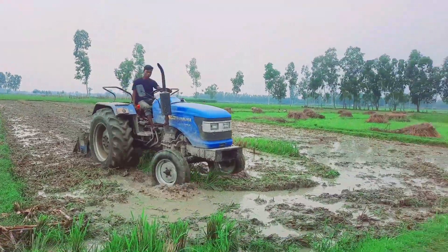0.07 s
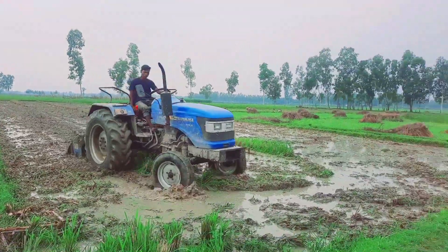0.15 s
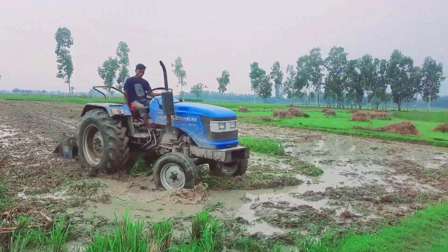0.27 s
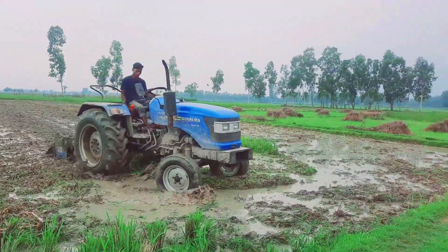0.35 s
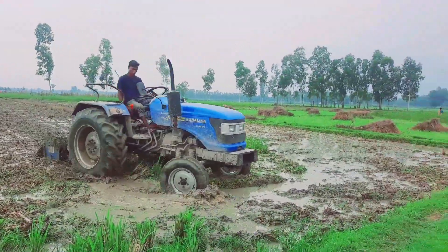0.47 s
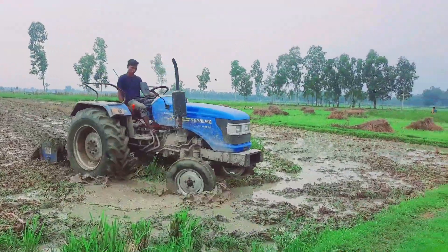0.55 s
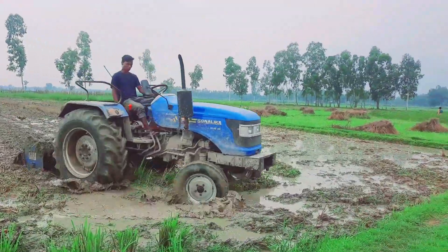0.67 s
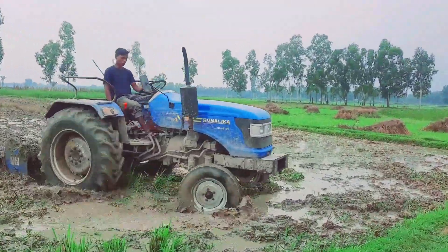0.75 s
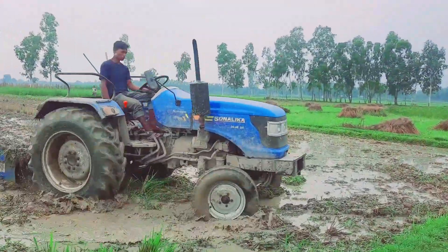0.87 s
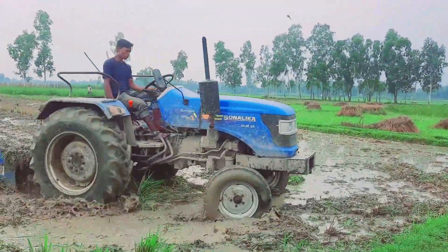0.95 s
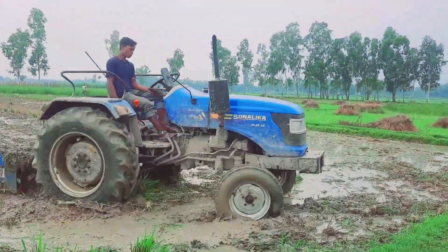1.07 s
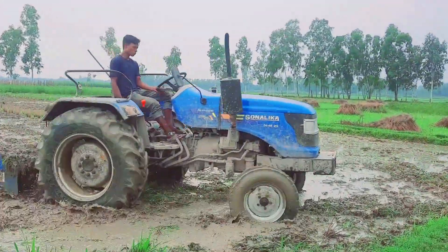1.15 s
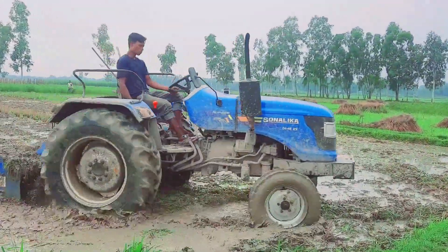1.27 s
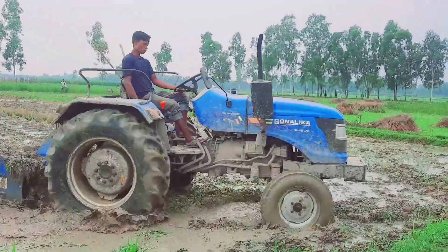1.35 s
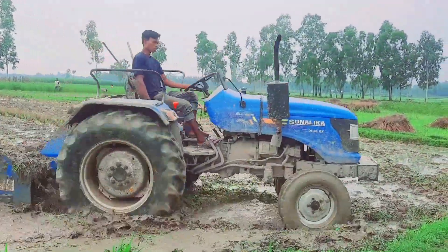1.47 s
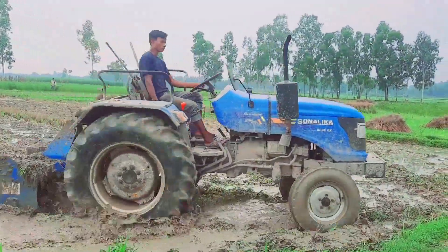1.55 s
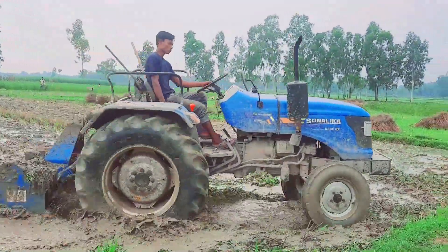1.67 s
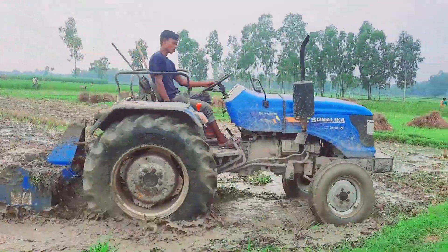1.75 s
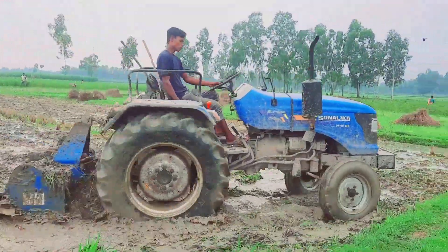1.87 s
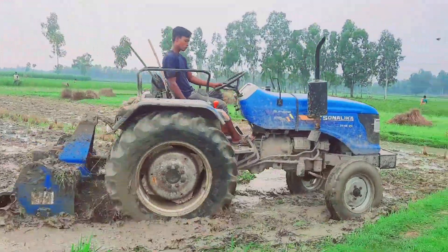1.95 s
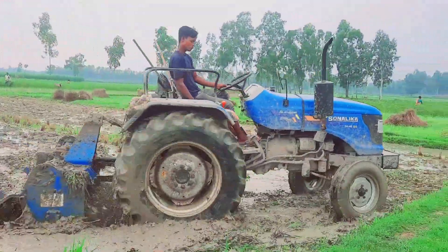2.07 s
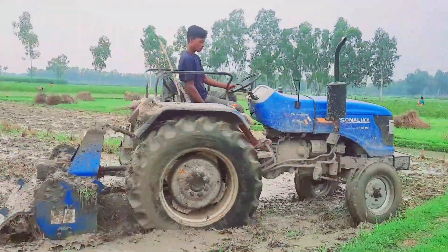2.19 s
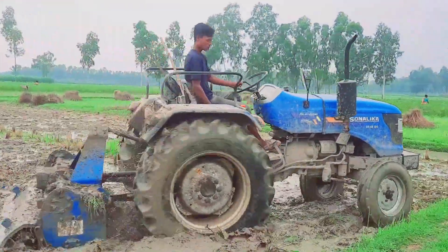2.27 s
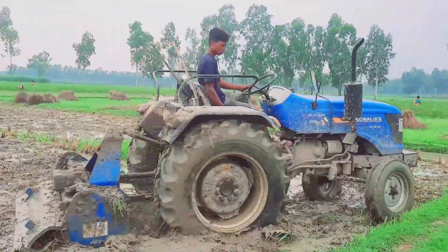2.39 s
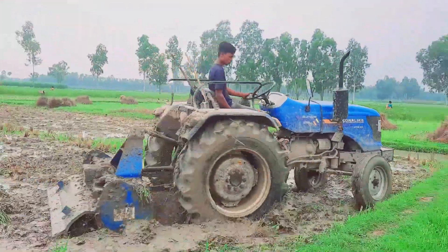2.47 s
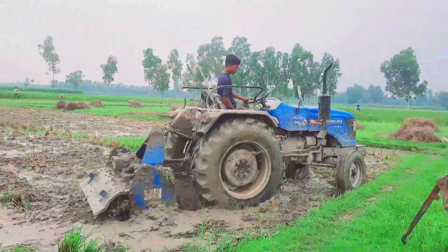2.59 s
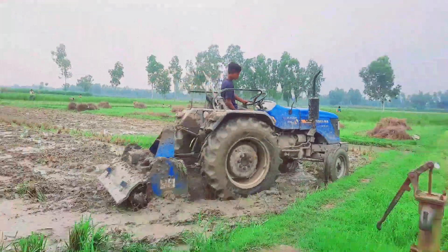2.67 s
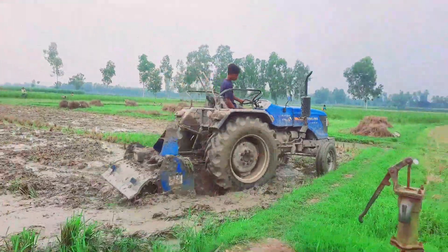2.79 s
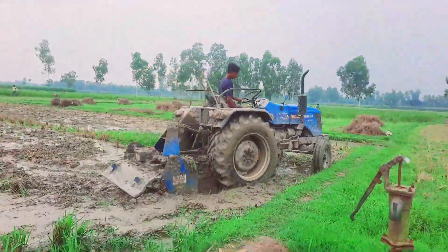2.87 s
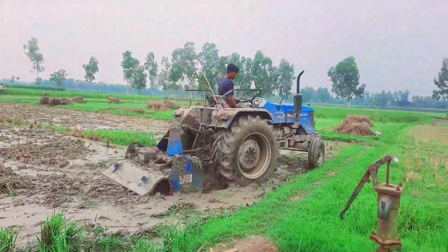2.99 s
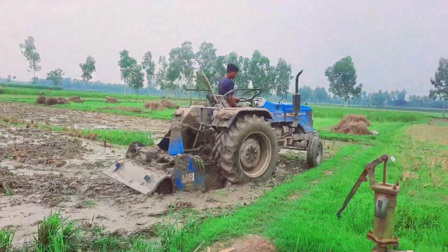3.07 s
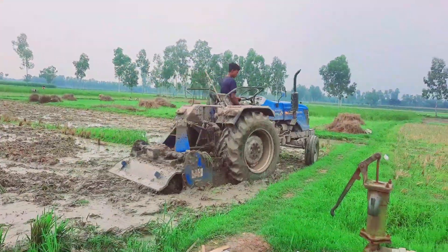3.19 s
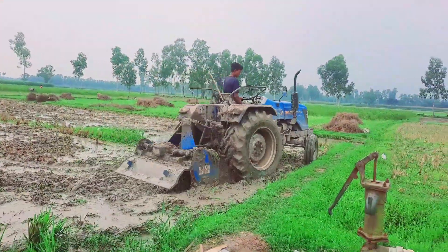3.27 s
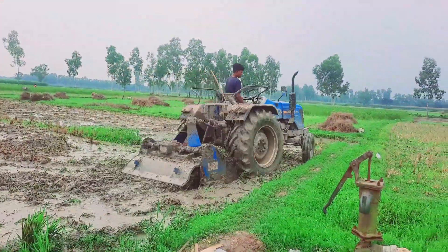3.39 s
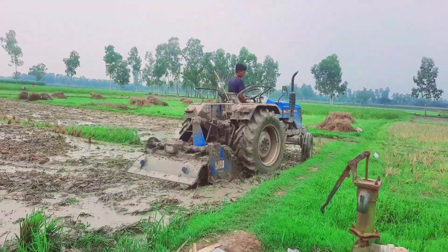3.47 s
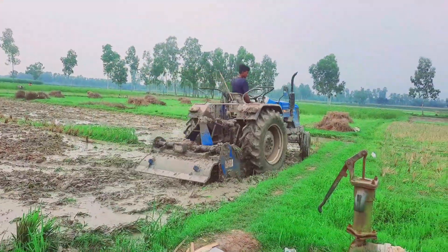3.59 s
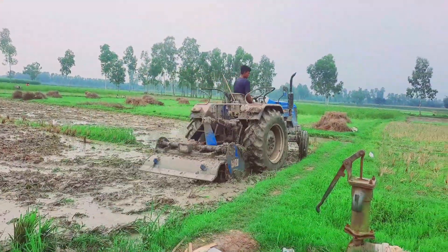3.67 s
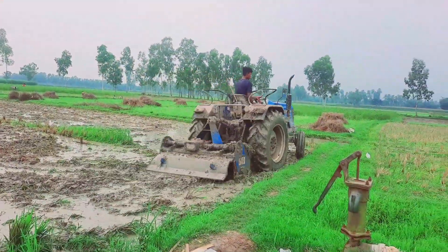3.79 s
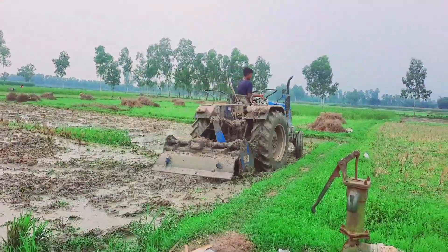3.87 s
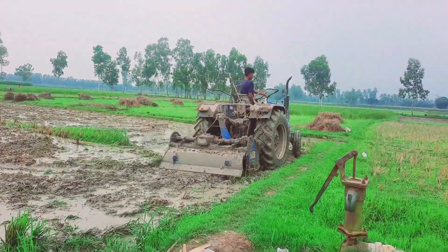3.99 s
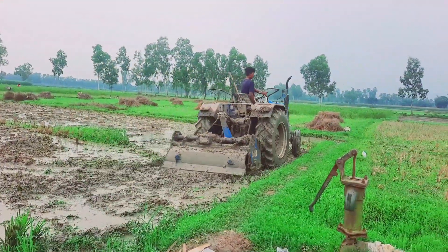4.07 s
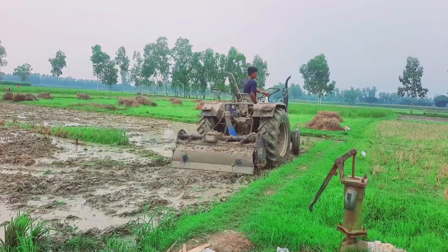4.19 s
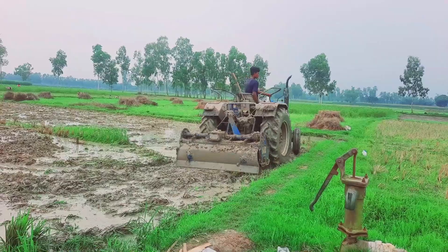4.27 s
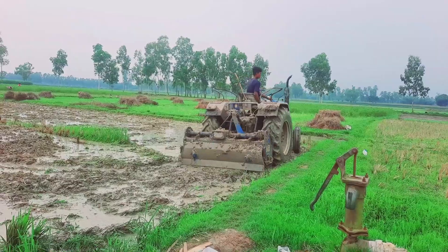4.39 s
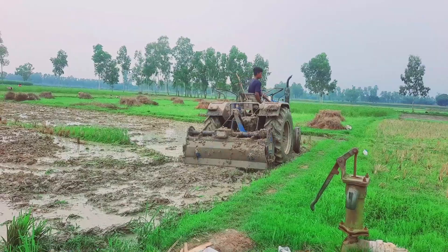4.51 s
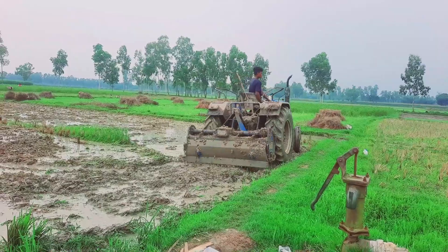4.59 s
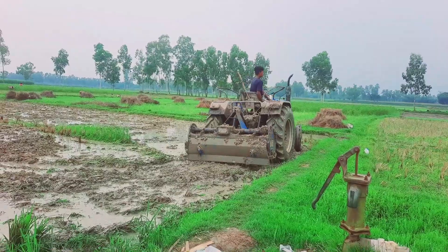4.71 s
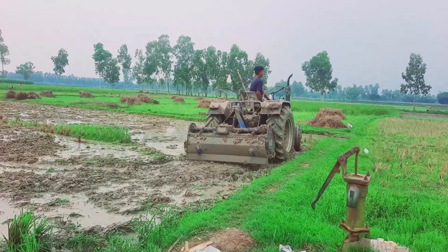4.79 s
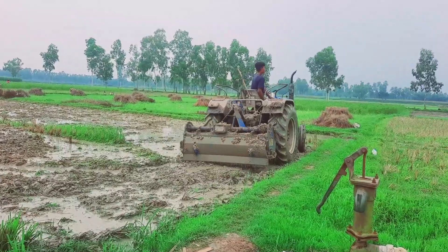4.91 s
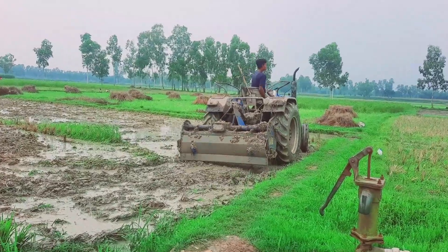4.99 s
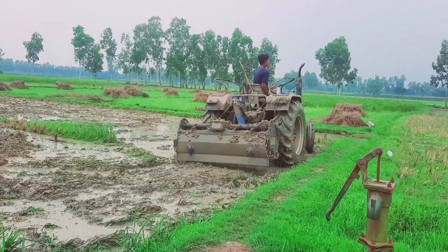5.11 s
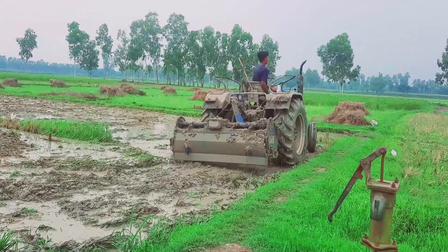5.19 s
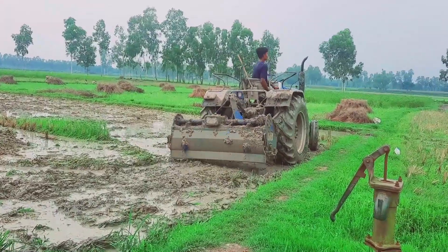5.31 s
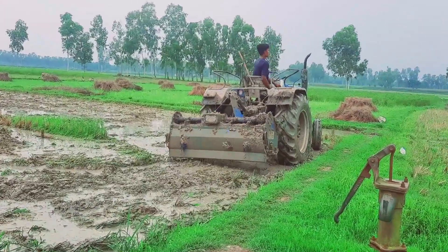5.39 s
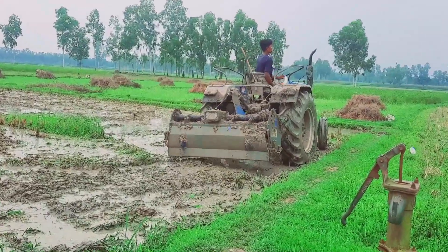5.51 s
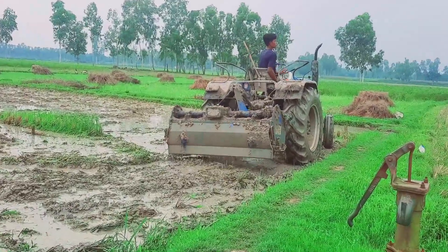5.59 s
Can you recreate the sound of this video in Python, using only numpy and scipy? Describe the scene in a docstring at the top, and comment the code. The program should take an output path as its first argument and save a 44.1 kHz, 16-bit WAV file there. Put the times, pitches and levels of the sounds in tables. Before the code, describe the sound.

A three-cylinder diesel tractor is already running under load at 0 s, a fast low throb near 40 firings per second that hunts slightly up and down. From 0.6 to 2.3 s it is closest and fullest: rough roar, hollow exhaust bark, mid-range clatter, crisp injector ticking and fine hiss. An unsteady high gear whine comes and goes, clearest from 1 to 3.5 s. From 3 s clatter and treble recede; the engine picks up briefly around 3.8 to 4.1 s, then quickly turns dull and quieter, slowing to about 25 firings per second by 5.2 s, a soft putter with a small swell. A hitch knock at 4.7 s is followed by fainter ones until 5.4 s. Tiny bird whistles occur at 4.8 and 5.25 s, then a clearer swooping one at 5.5 s. Open field, no audible echo; right channel dominates, left is muffled with low wind thumps, strongest at 4.1 s.

```python
"""A three-cylinder diesel tractor drags a rotary tiller through a flooded field, passes, throttles down and
settles at idle. Its exhaust sounds harmonics of the firing rate and pulse-driven resonances; roar, clatter,
chatter and hiss are noise modulated by each firing, injectors and hitch ring as damped modes, gears whine as sines.
A bird whistles near-sines late on. A hand-held phone listens: its right port is open, the left one half
covered (filtered, with treble by another path) and buffeted by wind, made of shaped noise and damped thumps."""
import sys
import numpy as np
from scipy import signal
from scipy.fft import rfft, irfft, next_fast_len
from scipy.io import wavfile
from scipy.ndimage import uniform_filter1d

SR = 44100
rng = np.random.default_rng(int(sys.argv[2]) if len(sys.argv) > 2 else 0)


def wrap_up_sound(samples):
    """Save the sound to the file named by the first command line argument, as 16-bit audio."""
    columns = np.atleast_2d(samples).T
    # keep every value between -1 and 1, then stretch to whole-number steps
    tamed = np.clip(columns, -1, 1)
    steps = np.round(tamed * 32767).astype(np.int16)
    wavfile.write(sys.argv[1], SR, steps)


N = 249165  # samples


def amp(db):
    """Logarithmic level: dB to amplitude gain."""
    return 10 ** (np.asarray(db) / 20)


def rms_one(x):
    """Normalisation to unit root-mean-square."""
    return x / np.sqrt(np.mean(x ** 2) + 1e-20)


def in_time(rows):
    """Linear interpolation of each table column after t, at every sample."""
    s, *columns = np.transpose(rows)
    return [np.interp(np.arange(N) / SR, s, c) for c in columns]


def colour(x, rows):
    """Linear filtering by a transfer function of f/Hz, level/dB and, optionally, phase lead/rad."""
    size = next_fast_len(N)
    hz, db, *lead = np.transpose(rows)
    log_hz = np.log(np.arange(size // 2 + 1) * SR / size + 1)
    gain = amp(np.interp(log_hz, np.log(hz), db))
    if lead:
        gain = gain * np.exp(1j * np.interp(log_hz, np.log(hz), lead[0]))
    return irfft(rfft(x, size) * gain, size)[..., :N]


def closed(rows):
    """Band limitation: the spectrum falls to -90 dB outside its ends."""
    below = (rows[0][0] / 1.15, -90)
    above = (rows[-1][0] * 1.15, -90)
    return [below] + list(rows) + [above]


def drift(rate):
    """Low-pass random process: a double pole at rate (Hz), of unit rms."""
    step = 40  # samples between the slow values
    r = np.exp(-2 * step * np.pi * rate / SR)
    noise = rng.standard_normal(N // step + 2002)
    slow = signal.lfilter([1], [1, -2 * r, r * r], noise)[2000:]
    return np.interp(np.arange(N) / step, np.arange(len(slow)), rms_one(slow))


def resonances(x, modes):
    """Modal superposition: parallel resonators of (f/Hz, width/Hz, level/dB), signs alternating."""
    out = 0
    for k, (hz, width, db) in enumerate(modes):
        r = np.exp(-np.pi * width / SR)
        poles = [1, -2 * r * np.cos(2 * np.pi * hz / SR), r * r]
        out = out + (-1) ** k * amp(db) * signal.lfilter([1 - r, 0, r - 1], poles, x)
    return out


def ring(clicks, hz, t60):
    """Impulse response of a damped oscillator: a unit click starts a sine of height 1."""
    r, w = amp(-60 / (t60 * SR)), 2 * np.pi * hz / SR
    return signal.lfilter([0, np.sin(w)], [1, -2 * r * np.cos(w), r * r], clicks + 1e-18)


def clicks_at(times, db):
    """Impulsive excitation: one click for each time."""
    clicks = np.zeros(N)
    clicks[np.clip((np.asarray(times) * SR).astype(int), 0, N - 1)] = amp(db)
    return clicks


def dull(x, hz):
    """Low-pass filtering, fourth-order Butterworth."""
    return signal.sosfilt(signal.butter(4, hz, fs=SR, output="sos"), x)


def puffing(turns, strength, steady, decay):
    """Amplitude modulation: two noises that swell at every firing and decay before the next."""
    puffs = uniform_filter1d(strength * np.exp(-decay * (turns % 1)), size=110)  # 2.5 ms smoothing
    return rng.standard_normal((2, N)) * (steady + puffs)


def seen_from(x, turned, side, rear):
    """Directivity: a power crossfade from the side spectrum to the rear one as the tractor turns away."""
    from_side = rms_one(colour(x, closed(side)))
    from_rear = rms_one(colour(x, closed(rear)))
    return np.sqrt(1 - turned) * from_side + np.sqrt(turned) * from_rear


# wind spectrum, relative: f/Hz, level/dB per Hz
WIND_SPECTRUM = [(15, -33.5), (30, -19.5), (45, 1), (70, 0), (120, -6.5), (200, -14), (400, -38.5),
                 (1000, -75.5), (3000, -85)]
# mean wind level before the lumps: left/dB, right/dB
WIND_LEVELS = [-40, -50]
# thumps on the covered port, strength before a 7 dB rise and the smoothing push: t/s, level/dB
WIND_THUMPS = [(0.694, -20), (1.558, -25), (1.638, -26), (2.006, -23), (2.385, -25), (2.776, -22),
               (3.411, -24), (4.102, -13), (4.261, -28), (4.505, -25), (4.81, -24), (5.068, -19.5),
               (5.364, -24.5), (5.521, -26), (5.573, -20)]
# sharp pops on the covered port, before the low-pass: t/s, level/dB
WIND_POPS = [(.68, -27), (5.051, -28.5), (5.546, -31)]
SOFT_THUMPS_PER_S, SOFT_THUMP_DB = 3.0, -26  # mean rate; median strength before the push


def wind():
    """Turbulent pressure: independent modulated noise per port; gusts ring the covered one."""
    lumps = [amp(4.0 * drift(7.6)), amp(1.5 * drift(8.3))]
    rumble = rms_one(colour(rng.standard_normal((2, N)), WIND_SPECTRUM))
    out = rumble * lumps * amp(WIND_LEVELS)[:, None]
    push = np.hanning(round(0.013 * SR))
    s, db = np.transpose(WIND_THUMPS)
    soft_db = SOFT_THUMP_DB + 3.0 * rng.standard_normal(N)
    soft = (rng.random(N) < SOFT_THUMPS_PER_S / SR) * amp(soft_db)
    thumps = ring(clicks_at(s - .014, db + 7.0) + soft, 72, 0.11)
    out[0] += np.convolve(thumps, push / push.sum())[:N]
    s, db = np.transpose(WIND_POPS)
    out[0] += dull(ring(clicks_at(s, db), 212, 0.078), 420)
    return out


# bird phrases, centre of the wavering pitch and level: t/s, f/Hz, level/dB
BIRD_PHRASES = [
    [(4.82, 3650, -95), (4.83, 3650, -83), (4.845, 3600, -87), (4.855, 3550, -95)],
    [(5.23, 3500, -92), (5.26, 3650, -80), (5.29, 3500, -79), (5.30, 3300, -87)],
    [(5.517, 7400, -100), (5.53, 6780, -76), (5.545, 5500, -75), (5.564, 3900, -86), (5.59, 3500, -83),
     (5.61, 3700, -74), (5.624, 3470, -71), (5.634, 2660, -86), (5.65, 2160, -70)],
]
BIRD_OCTAVE_DB = -19  # against the fundamental


def bird():
    """Frequency modulation: gliding near-sine whistles with a weak second harmonic."""
    out = 0
    t = np.arange(N) / SR
    for phrase in BIRD_PHRASES:
        hz, db = in_time(phrase)
        hz = hz * (1 + .015 * drift(80.0))  # a husky waver
        phase = 2 * np.pi * np.cumsum(hz) / SR
        sounding = (t > phrase[0][0]) & (t < phrase[-1][0])
        whistle = np.sin(phase) + amp(BIRD_OCTAVE_DB) * np.sin(2 * phase)
        out = out + sounding * amp(db + 4.0 * drift(90.0)) * whistle
    return out


# hitch knocks, strength of the excitation: t/s, high level/dB, low level/dB
HITCH_KNOCKS = [(4.706, -41, -26.5), (4.957, -54, -55), (5.108, -53, -50), (5.3, -46, -46),
                (5.41, -48, -48)]
# hitch modes: f/Hz, level/dB, t60/s, group (1 = high, 0 = low)
HITCH_MODES = [(160, -8, .08, 0), (250, -6, .07, 0), (340, -1, .07, 0), (410, 0, .07, 0), (800, 0, .03, 1),
               (1000, -1, .02, 1), (1200, -6, .015, 1)]


def hitch():
    """Modal impact: a tick on the high modes, then the weight lands and bounces on the low ones."""
    s, high_db, low_db = np.transpose(HITCH_KNOCKS)
    tick = clicks_at(s, high_db)
    landing = clicks_at(s + .002, low_db - 7)
    landing = landing - clicks_at(s + .009, low_db - 3)
    landing = landing + clicks_at(s + .024, low_db - 7)
    landing = dull(landing, 460)  # a soft contact
    knocks = sum(amp(db) * ring(tick if high > .5 else landing, hz, t60)
                 for hz, db, t60, high in HITCH_MODES)
    return dull(dull(knocks, 1400), 1400)


# loose sheet metal at the rear, one pass of two in series: f/Hz, width/Hz, level/dB
SHEET_MODES = [(2320, 230, 0), (3130, 250, -5.5)]
# mean level when the clatter is at RATTLE_FROM_DB; dB per dB of clatter; unevenness
RATTLE_DB, RATTLE_FROM_DB, RATTLE_STEEPNESS, RATTLE_BURSTS_DB = -72.5, -53, 2.07, 5


def sheet_rattle(turns, knock, clatter_db):
    """Forced resonance: firing noise drives loose sheets, steeply rising with the clatter."""
    drive = puffing(turns, knock, .5, 2.5)[0]
    rattle = rms_one(resonances(resonances(drive, SHEET_MODES), SHEET_MODES))
    level_db = RATTLE_DB + RATTLE_STEEPNESS * (clatter_db - RATTLE_FROM_DB)
    return amp(level_db + RATTLE_BURSTS_DB * drift(16.0)) * rattle


# top hiss spectrum, relative: f/Hz, level/dB per Hz
HISS_SPECTRUM = [(5590, -37), (9500, -18.5), (11000, -7.5), (13600, -3.5), (15100, -3.5), (16000, -1)]


def top_hiss(turns, knock):
    """Modulated noise: a high band bursts at each firing."""
    return rms_one(colour(puffing(turns, knock, .9, 4.0), closed(HISS_SPECTRUM)))


# spit noise spectrum, relative: f/Hz, level/dB per Hz
SPIT_SPECTRUM = [(2060, -23), (3500, -4), (3730, -5.5), (3980, 2), (4530, -1), (4910, -2.5), (6410, -11),
                 (7360, -19), (9500, -32.5), (12400, -64), (20900, -120)]
# injector needle modes, mean strength: f/Hz, level/dB, t60/s
NEEDLE_MODES = [(4050, -7, .03), (4400, -3, .025), (4550, 0, .028), (5100, -12, .025), (5800, -12, .02),
                (6400, -14, .02), (7000, -20, .015)]
# pings against spit, clearest side-on: t/s, level/dB
PING_LEVEL = [(0, -14), (.6, -6), (1.2, -1), (1.7, -2), (2.3, -8), (3.2, -12), (3.8, -25), (5.65, -30)]


def injectors(firing, turns, knock):
    """Modal excitation: each injection pings the needle with new strengths and spits noise."""
    start = np.diff(firing, prepend=firing[0])
    strength = np.clip(rng.standard_normal((400, 2, len(NEEDLE_MODES))), -2, 1.5)
    strength_db = 5.5 * strength[firing].T
    pings = sum(ring(start * amp(db + strength_db[k]), hz, t60)
                for k, (hz, db, t60) in enumerate(NEEDLE_MODES))
    pings = pings * np.minimum(1, (turns % 1) / .08)  # builds up over 8 % of a firing interval
    pings = signal.sosfilt(signal.butter(4, [3600, 7500], "band", fs=SR, output="sos"), pings)
    spit = colour(puffing(turns, knock, 0.24, 0.89), closed(SPIT_SPECTRUM))
    return rms_one(spit) + amp(in_time(PING_LEVEL)[0]) * rms_one(pings)


# chatter spectrum, relative: f/Hz, level/dB per Hz
CHATTER_SPECTRUM = [(1060, -24.5), (1800, -0.5), (2020, -1), (2620, 0.5), (2850, -5), (3180, -4),
                    (3700, -15), (4810, -34.5), (8140, -120)]


def chatter_noise(turns, knock):
    """Modulated noise: a treble band swells with each knock."""
    return rms_one(colour(puffing(turns, knock, 0.95, 1.8), closed(CHATTER_SPECTRUM)))


# clatter spectra from side and rear, relative: f/Hz, level/dB per Hz
CLATTER_SIDE = [(330, -16), (560, -11), (616, -11), (671, -5.5), (904, 0.5), (1080, -5.5), (1250, -7.5),
                (1520, -9), (2000, -26), (2600, -24), (4400, -120)]
CLATTER_BEHIND = [(340, -51.5), (580, -24.5), (630, -13), (751, 5), (974, 2.5), (1100, -3.5), (1200, -1),
                  (1280, -10.5), (1380, -5), (2000, -33.5), (2600, -50.5), (4400, -120)]


def clatter_noise(turns, knock, turned):
    """Modulated, directional noise: a middle band swells with each knock."""
    clatter = seen_from(puffing(turns, knock, 1.9, 1.8), turned, CLATTER_SIDE, CLATTER_BEHIND)
    return clatter * amp(1.2 * drift(10.0))


# gear whine, centre of the wavering peak level: t/s, level/dB
WHINE_LEVEL = [(0, -63), (.8, -59.5), (1.15, -49), (1.7, -55.5), (1.9, -47.5), (2.08, -51), (2.25, -63),
               (2.45, -52.5), (2.7, -55.5), (2.8, -59), (2.95, -51), (3.1, -63), (3.25, -48.5), (3.5, -54),
               (3.62, -72), (5.65, -89)]
# second gear, likewise: t/s, level/dB
LOW_WHINE_LEVEL = [(0, -90), (1.2, -73), (1.45, -51.5), (1.9, -56), (2.1, -53), (2.35, -51), (2.5, -70),
                   (5.65, -89)]
WHINE_ORDER, LOW_WHINE_ORDER = 34.6, 30.8  # cycles per firing


def gear_whine(turns):
    """Order tracking: two sines at fixed ratios to the firing rate, with unsteady level and phase."""
    high_db = in_time(WHINE_LEVEL)[0] + 2.0 * drift(8.0)
    high = np.sin(2 * np.pi * WHINE_ORDER * turns + .4 * drift(20.0))
    low_db = in_time(LOW_WHINE_LEVEL)[0] + 1.4 * drift(6.0)
    low = np.sin(2 * np.pi * LOW_WHINE_ORDER * turns + .5 * drift(11.0))
    return amp(high_db) * high + amp(low_db) * low


# roar spectra from side and rear, relative: f/Hz, level/dB per Hz
ROAR_SIDE = [(30, -32), (53, -17), (82, -13), (130, -11), (190, -8), (230, -9), (330, -4), (400, -11),
             (487, -20), (567, -40), (620, -46)]
ROAR_BEHIND = [(18, -34.5), (30, -9.5), (70, -4), (108, -6), (156, -1.5), (237, -11.5), (309, -4.5),
               (369, -15), (553, -33.5), (620, -42), (810, -65), (1360, -120)]


def roar_noise(turns, cylinder_db, turned):
    """Modulated, directional noise: a low band puffs with unequal cylinders."""
    roar = seen_from(puffing(turns, amp(cylinder_db), 1.5, 2.0)[0], turned, ROAR_SIDE, ROAR_BEHIND)
    return amp(2.0 + 1.35 * drift(7.0)) * roar


# exhaust resonances before the band-pass: f/Hz, width/Hz, level/dB
PIPE_MODES = [(165, 23, -10), (264.7, 28, 4), (325.4, 70, 0.5), (433.5, 100, -3)]


def exhaust_bark(firing, cylinder_db, spread):
    """Pulse-excited resonance: every firing strikes the exhaust pipe's modes."""
    pulses = np.diff(firing, prepend=firing[0]) * amp(.4 * cylinder_db + .8 * spread)
    band = signal.butter(4, [170, 420], "band", fs=SR, output="sos")
    return rms_one(signal.sosfilt(band, resonances(pulses, PIPE_MODES)))


# what the silencer passes: f/Hz, level/dB
SILENCER_PASSES = [(25, -37), (37, -26.5), (50, -15), (62, 0), (75, 0.5), (90, -2), (105, -9.5), (125, -10),
                   (150, -12), (200, -17.5), (260, -24), (340, -20)]


def passed_db(hz):
    """Transmission: the silencer's level interpolated over log frequency."""
    pass_hz, db = np.transpose(SILENCER_PASSES)
    return np.interp(np.log(hz), np.log(pass_hz), db)


# multiples of the firing rate heard as tones: order
TONE_ORDERS = [1, 2, 3, 4, 5, 7, 8, 9]
# Gaussian swell of each order, at its own time: t/s, width/s, level/dB
ORDER_SWELLS = [(4.3, .35, 21), (4.8, 0.21, 0.5), (1.8, 0.79, 5), (2.2, 0.67, 9), (1.54, .6, 8.5),
                (4.6, 0.57, 16), (3, .9, 5.5), (0.75, 1.1, 2.5)]


def exhaust_tones(rate, turns, tone_db, cylinder_db):
    """Harmonic synthesis: wavering orders through the silencer; unequal cylinders add thirds between."""
    t = np.arange(N) / SR
    tones = 0
    for order, (s, width, swell_db) in zip(TONE_ORDERS, ORDER_SWELLS):
        db = tone_db + passed_db(order * rate) + swell_db * np.exp(-((t - s) / width) ** 2)
        waver_db = (.15 + .25 * order) * drift(6.0)  # low orders are nearly pure
        phase = 2 * np.pi * order * turns + .06 * order * drift(6.0) + order - 1
        tones = tones + amp(db + waver_db) * np.sin(phase)
    return tones * amp(.8 * dull(cylinder_db, 60)) * np.sqrt(2)


# the governor hunts under load, the throttle closes, the engine settles at idle: t/s, firing rate f/Hz
FIRING_RATE = [(0, 41.3), (.42, 37.8), (.79, 40.0), (1.3, 36.6), (1.6, 37.0), (1.97, 35.0), (2.2, 37.2),
               (2.37, 37.3), (2.52, 35.0), (2.68, 34.8), (2.92, 37.3), (3.26, 34.2), (3.45, 34.3),
               (3.75, 37.7), (4.08, 38.0), (4.6, 30.4), (5.18, 24.8), (5.65, 24.7)]
# exhaust before silencer and swells (tone), after the pipe (bark): t/s, tone level/dB, bark level/dB
EXHAUST_LEVELS = [(0, -22.5, -52.5), (.15, -25, -53.5), (.6, -24, -39), (1.3, -24.5, -37),
                  (1.9, -25.5, -37.5), (2.5, -26.5, -51.5), (3.1, -27.5, -46), (3.55, -29, -52),
                  (3.95, -31, -39), (4.12, -40, -56.5), (4.6, -43.5, -52.5), (5.1, -43, -54.5),
                  (5.26, -35, -44.5), (5.65, -35.5, -54)]
# noise levels before each source's own wavering; the roar gains 2 dB: t/s, roar, clatter, chatter level/dB
NOISE_LEVELS = [(0, -35.5, -44.5, -58), (.7, -33.5, -41.5, -54), (1.5, -34.5, -42.5, -55.5),
                (2.3, -33, -45, -56), (3.0, -35.5, -47.5, -60), (3.75, -38.5, -53, -63),
                (4.06, -42, -57.5, -73.5), (4.3, -38.5, -57.5, -74.5), (4.6, -43.5, -61, -83.5),
                (5.0, -43.5, -64, -90.5), (5.24, -43.5, -58, -88), (5.45, -41, -54.5, -83),
                (5.65, -43, -58, -85.5)]
# how much of the engine block is in view: t/s, share
BLOCK_IN_VIEW = [(0, 0.84), (.3, 0.55), (.5, 0.91), (3.5, 1), (4.05, 0), (5.65, 0)]
# strength of the three firings of a cycle, scaled down for tones and bark: level/dB
CYLINDER_STRENGTHS = [0, -2.5, -1.2]
# share of the rear view: t/s, share
TURNED_AWAY = [(0, 0), (3.3, 0), (4.2, 1), (5.65, 1)]
TICKS_DB, HISS_DB = -11, -27  # against chatter
HIDDEN_TICKS_DB, HIDDEN_HISS_DB = -7.5, -10  # further loss when the block is out of view
HISS_FLOOR_DB = -93.5  # the hiss level never sinks below this


def tractor():
    """Superposition of sources locked to the firing phase; returns open-port sound and other-path treble."""
    rate, = in_time(FIRING_RATE)
    tone_db, bark_db = in_time(EXHAUST_LEVELS)
    roar_db, clatter_db, chatter_db = in_time(NOISE_LEVELS)
    turned, = in_time(TURNED_AWAY)
    hidden = 1 - np.clip(in_time(BLOCK_IN_VIEW)[0], 0, 1)
    ticks_db = chatter_db + TICKS_DB + HIDDEN_TICKS_DB * hidden
    hiss_db = np.maximum(chatter_db + HISS_DB + HIDDEN_HISS_DB * hidden, HISS_FLOOR_DB)
    turns = np.cumsum(rate) / SR + 0.0512  # one turn per firing
    firing = turns.astype(int)
    spread = rng.standard_normal((400, 2))[firing].T
    cylinder_db = np.array(CYLINDER_STRENGTHS)[firing % 3]
    knock = amp(cylinder_db + 2.2 * spread[1])

    low = exhaust_tones(rate, turns, tone_db, cylinder_db) + gear_whine(turns)
    low = low + amp(roar_db) * roar_noise(turns, cylinder_db, turned)
    low = low + amp(bark_db) * exhaust_bark(firing, cylinder_db, spread[0])

    # two channels: the open port and the other path
    high = amp(clatter_db) * clatter_noise(turns, knock, turned)
    high = high + amp(chatter_db) * chatter_noise(turns, knock)
    high = high + amp(hiss_db) * top_hiss(turns, knock)
    high = high + amp(ticks_db) * injectors(firing, turns, knock)
    rattle = np.sqrt(turned) * sheet_rattle(turns, knock, clatter_db)
    return low + high[0] + rattle, high[1]


# the covered port's response, before its overall loss: f/Hz, level/dB, phase lead/rad
COVER_RESPONSE = [(40, 3.5, -0.4), (126, 7, -0.1), (310, 2.5, -2), (500, 7, -2.2), (696, 4.5, -0.6),
                  (1000, 6.5, -2), (1120, 10.5, -3), (1420, -11, -3), (1700, -18.5, -11), (2100, -20, -6.5),
                  (2400, -11.5, -20.5), (3200, -12, -20), (4620, -6, 4), (6000, -11.5, -27)]
# other-path treble round the hand, against the open port: f/Hz, level/dB
ROUND_HAND_RESPONSE = [(500, -16), (650, -28), (1200, -42.5), (2000, -30), (2700, -20), (3300, -20.5),
                       (3700, -21), (4200, -10), (5000, -13.5), (5700, -11), (7000, -30.5), (10000, 1.5),
                       (16000, 1)]
OPEN_PORT_DB = 6  # gain on all sources but the wind
COVERED_DB, COVERED_REAR_DB = -24.5, -8  # left against right; further loss that grows with the share of the rear view


def scene():
    """Transmission and diffraction: the open port hears all, the covered one a muffled copy plus treble."""
    machine, other_path = tractor()
    to_edge = np.minimum(np.arange(N), np.arange(N)[::-1])
    edges = np.clip(to_edge / (.004 * SR), 0, 1)  # soft start and stop
    direct = edges * amp(OPEN_PORT_DB) * (machine + hitch() + bird())
    loss_db = COVERED_DB + COVERED_REAR_DB * in_time(TURNED_AWAY)[0]
    muffled = amp(loss_db) * colour(direct, COVER_RESPONSE)
    round_hand = amp(OPEN_PORT_DB) * colour(other_path, ROUND_HAND_RESPONSE)
    return np.array([muffled + round_hand, direct]) + edges * wind()


# microphone noise spectrum, relative: f/Hz, level/dB per Hz
SELF_NOISE_SPECTRUM = [(300, 3.5), (1500, -7.5), (9000, -14.5), (15500, -19.5)]
SELF_NOISE_DB, CUTOFF_HZ = -79.5, 15700  # noise rms before the cut; low-pass edge


def record(dry):
    """Self-noise and band limitation: shaped microphone noise, then a steep elliptic low-pass."""
    noise = amp(SELF_NOISE_DB) * rms_one(colour(rng.standard_normal((2, N)), SELF_NOISE_SPECTRUM))
    low_pass = signal.ellip(12, .5, 70, CUTOFF_HZ, fs=SR, output="sos")
    return signal.sosfilt(low_pass, dry + noise)


dry = scene()
out = record(dry)
wrap_up_sound(out)
```